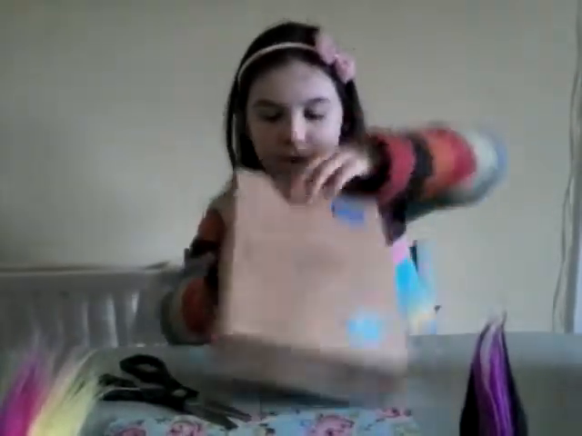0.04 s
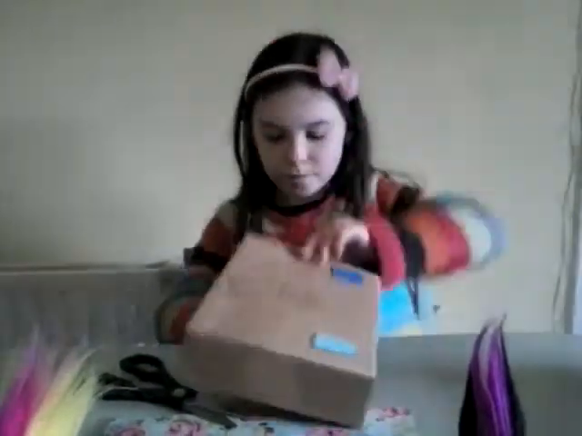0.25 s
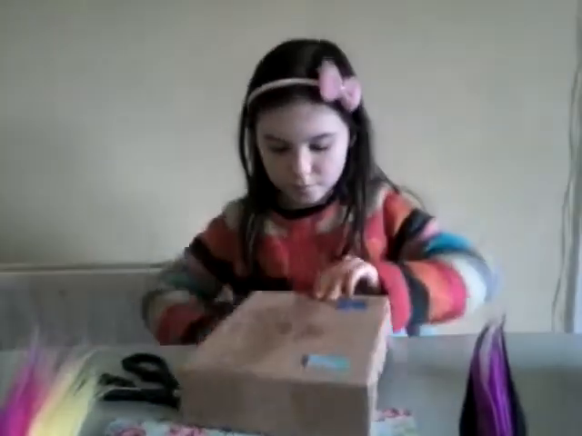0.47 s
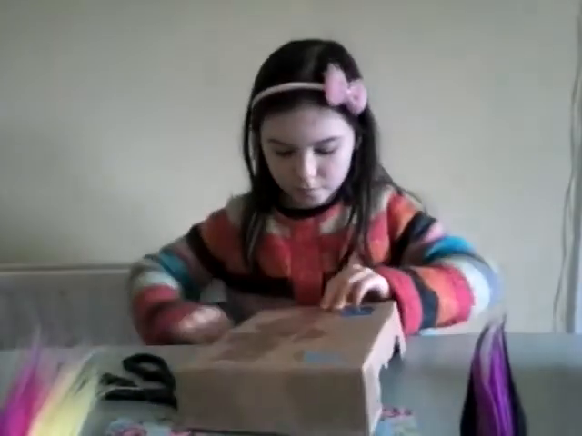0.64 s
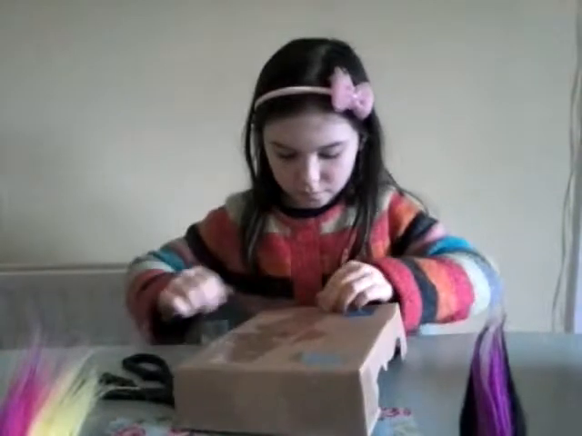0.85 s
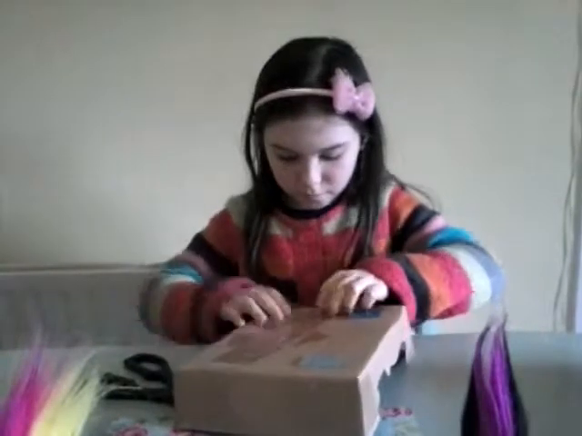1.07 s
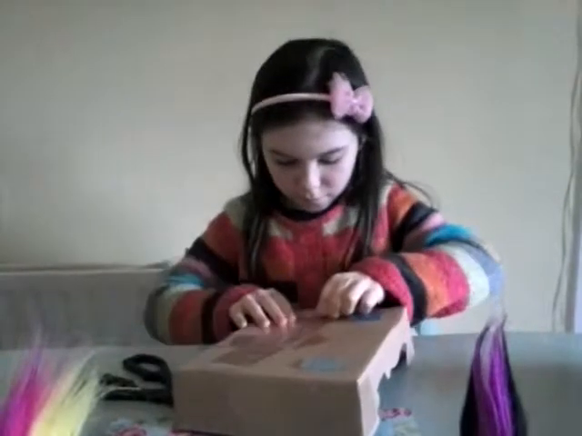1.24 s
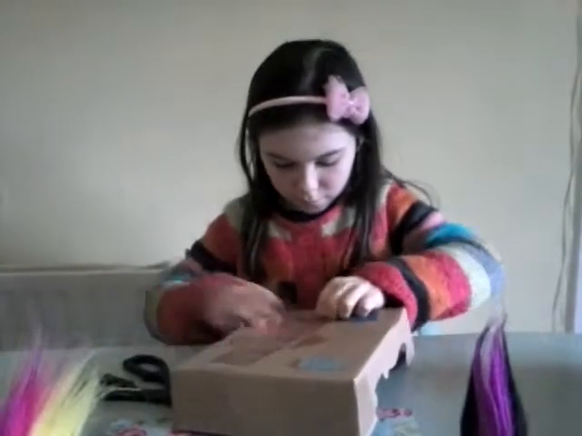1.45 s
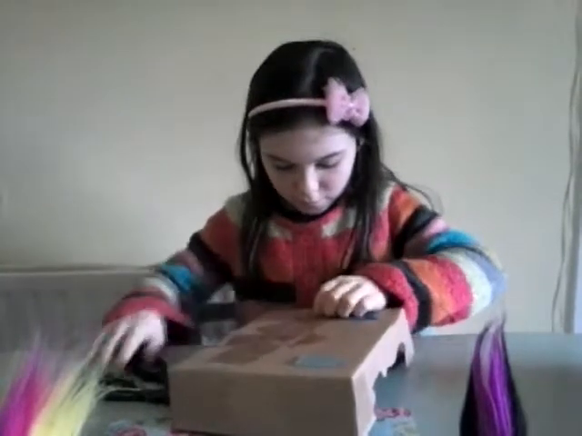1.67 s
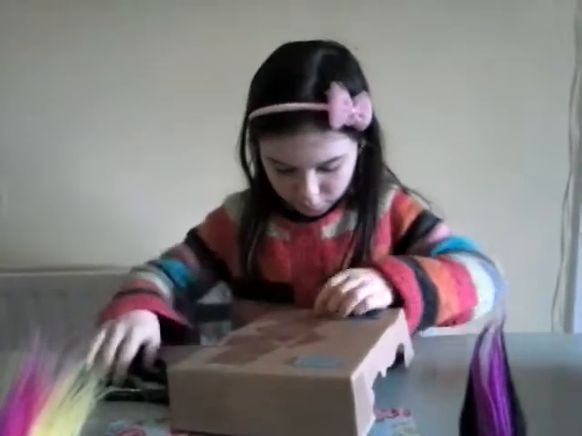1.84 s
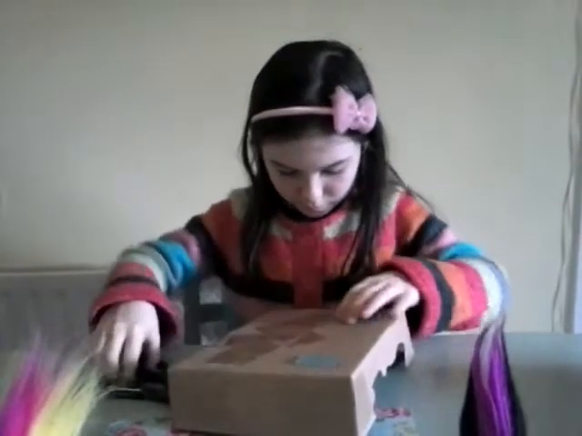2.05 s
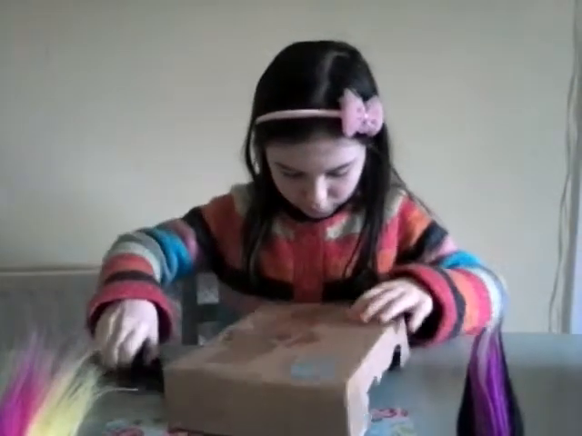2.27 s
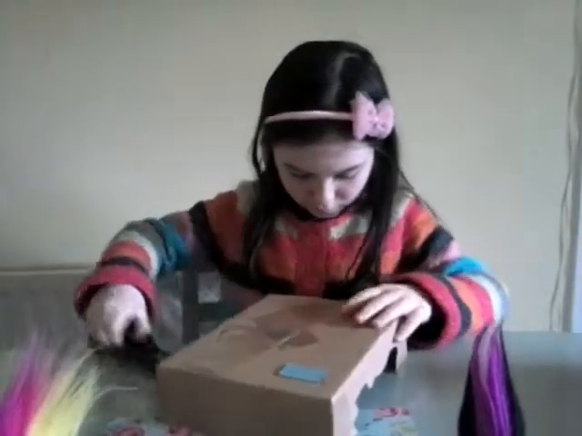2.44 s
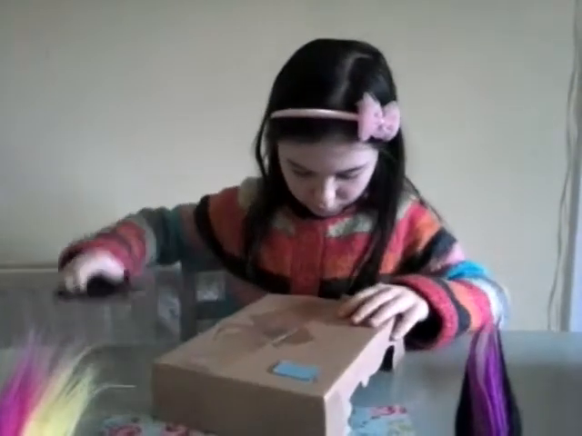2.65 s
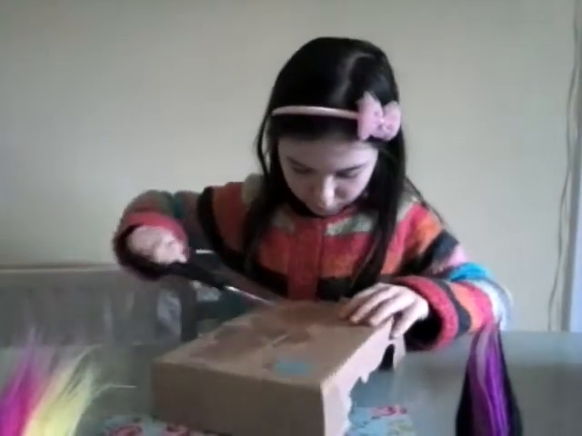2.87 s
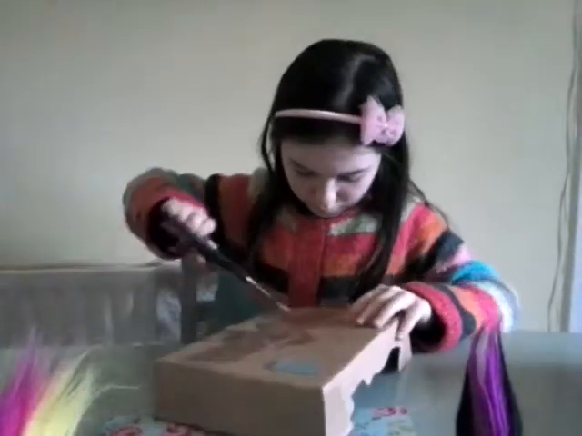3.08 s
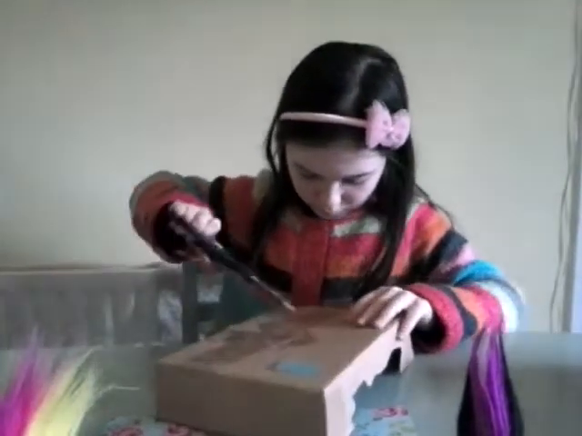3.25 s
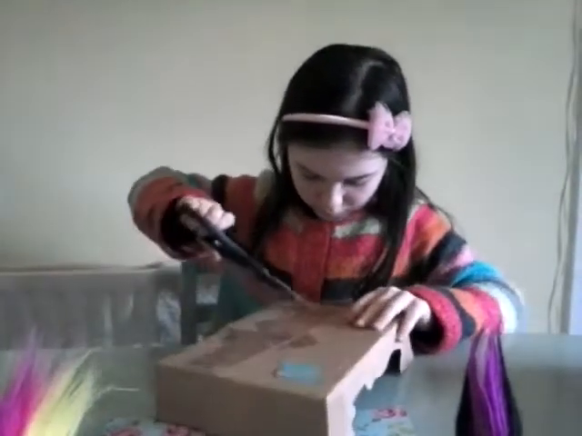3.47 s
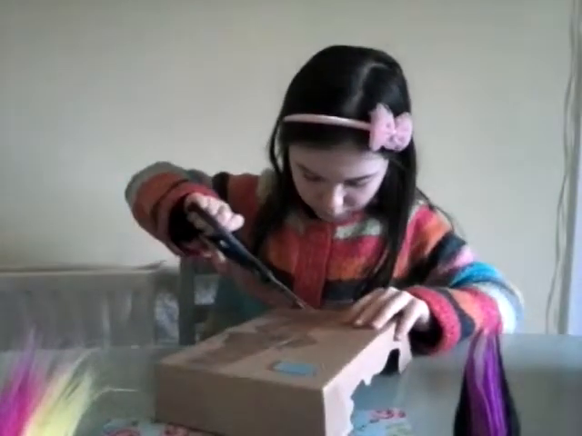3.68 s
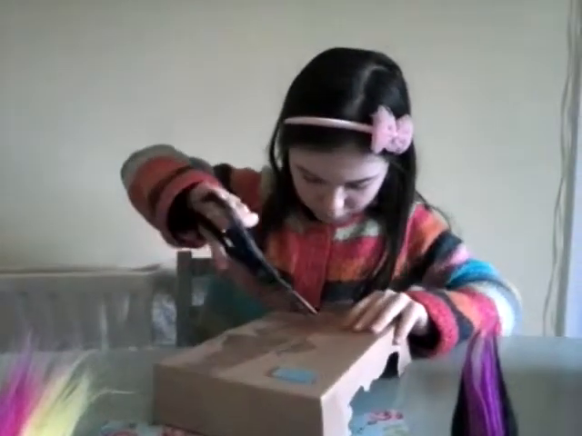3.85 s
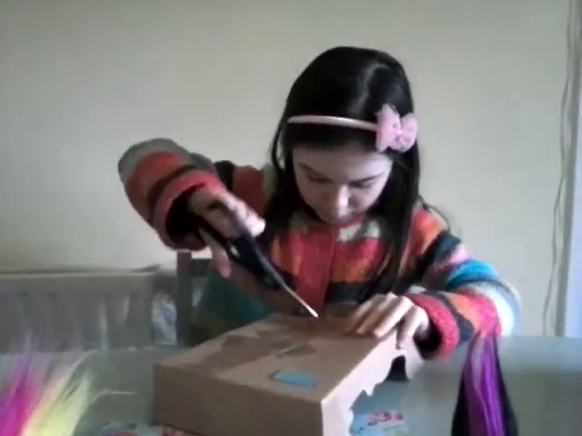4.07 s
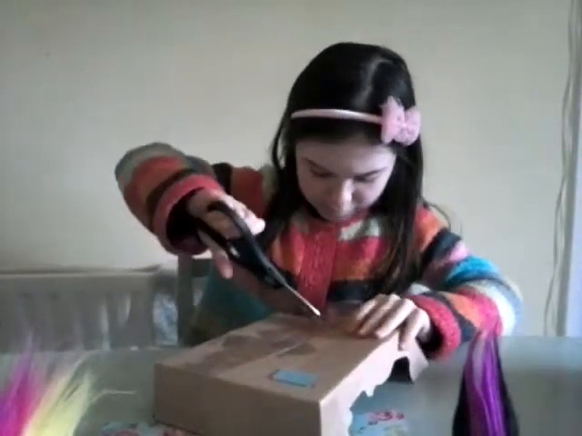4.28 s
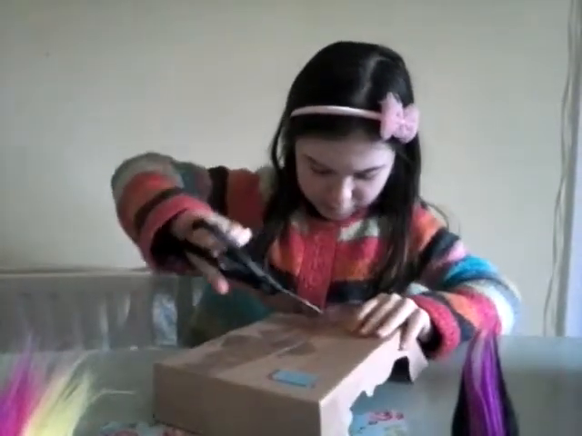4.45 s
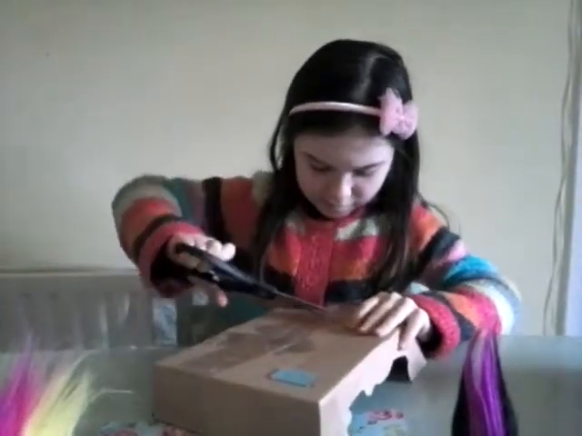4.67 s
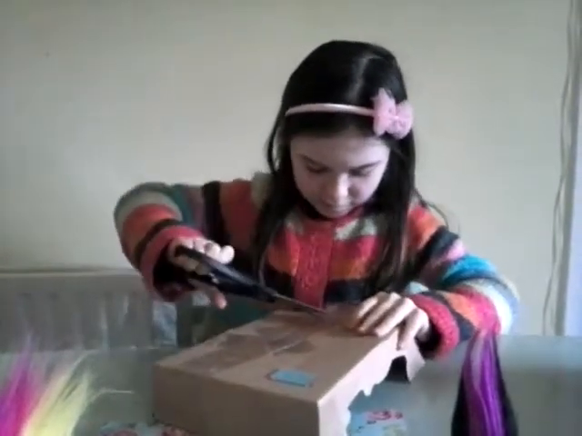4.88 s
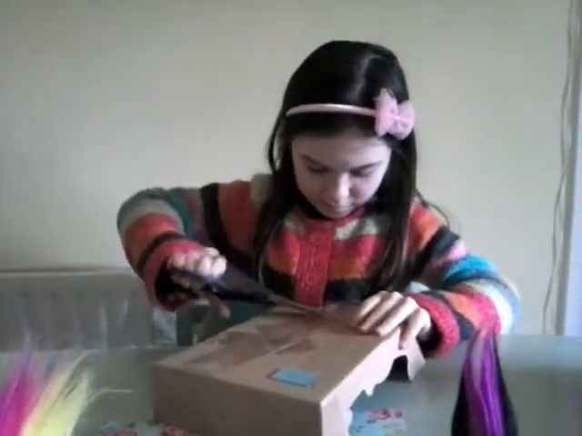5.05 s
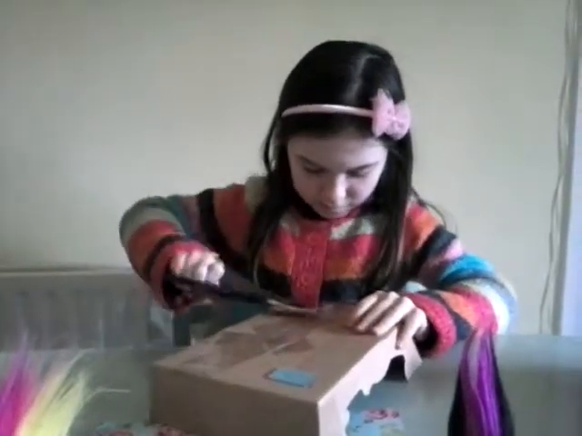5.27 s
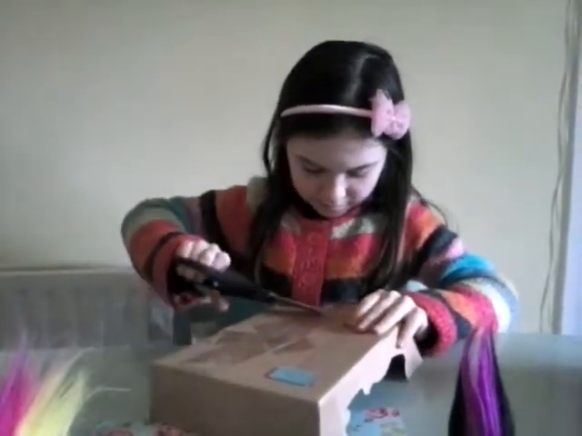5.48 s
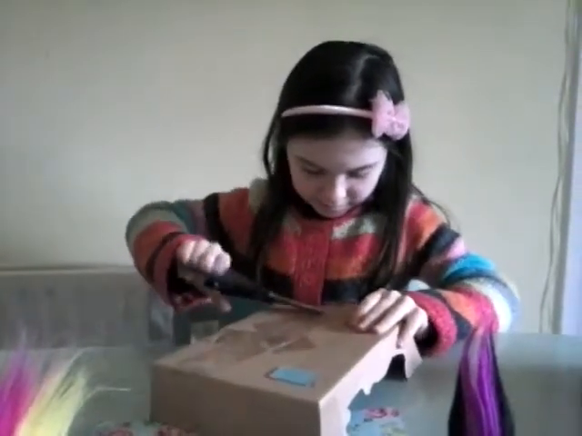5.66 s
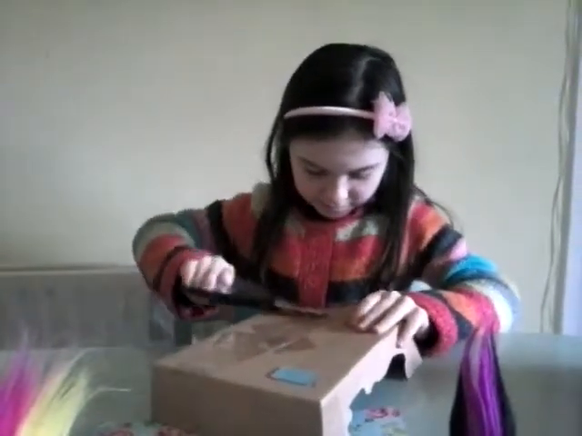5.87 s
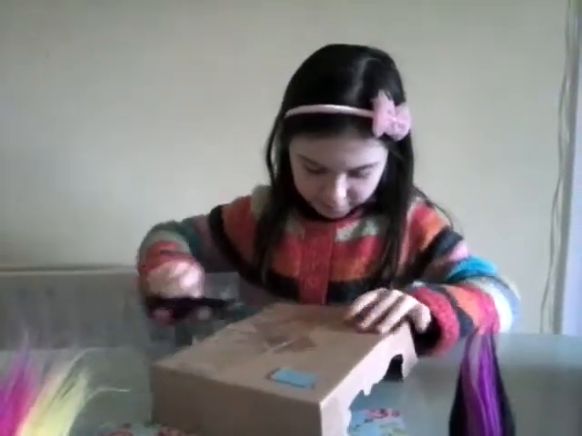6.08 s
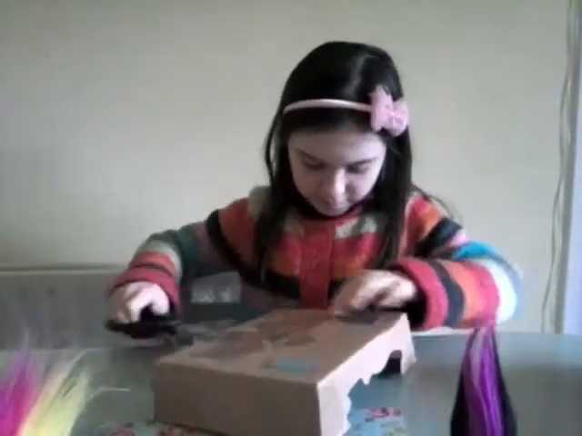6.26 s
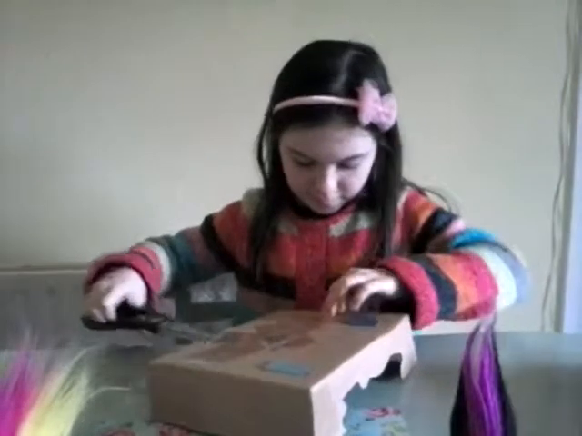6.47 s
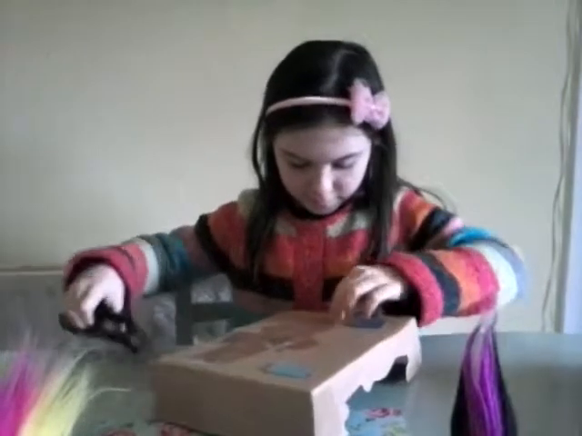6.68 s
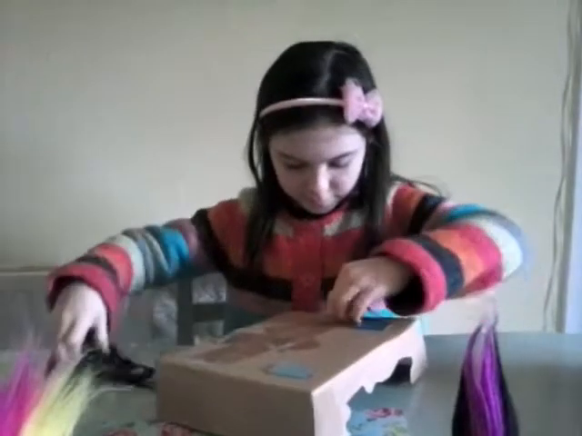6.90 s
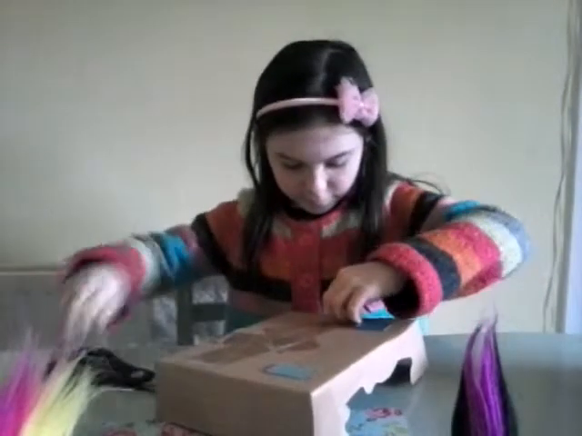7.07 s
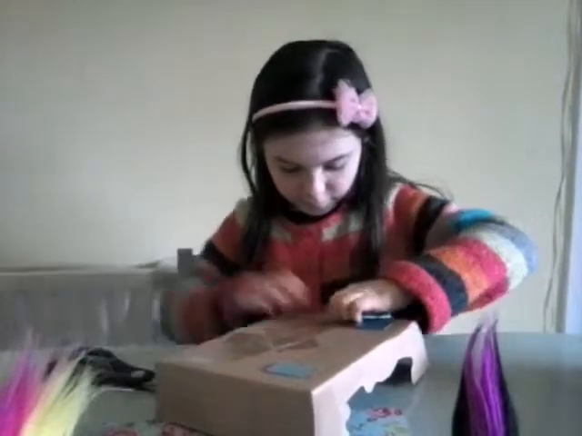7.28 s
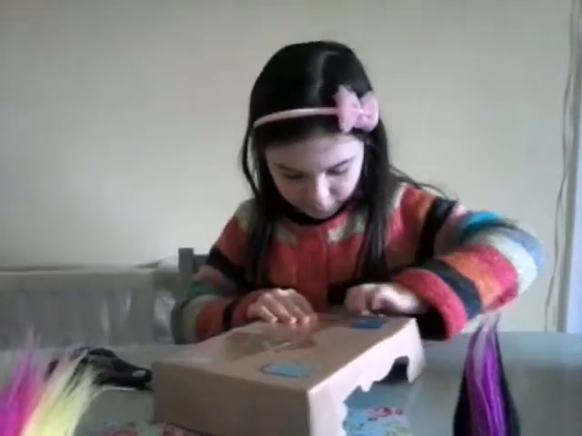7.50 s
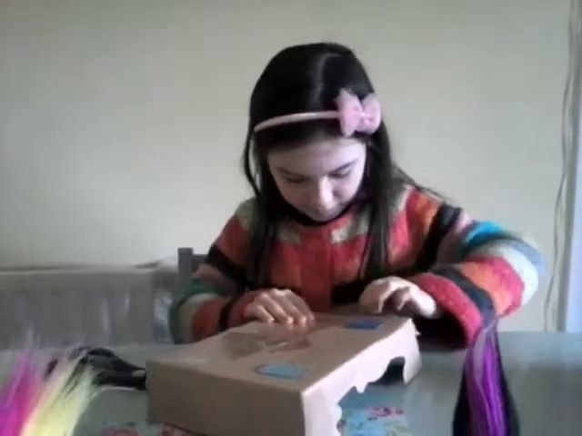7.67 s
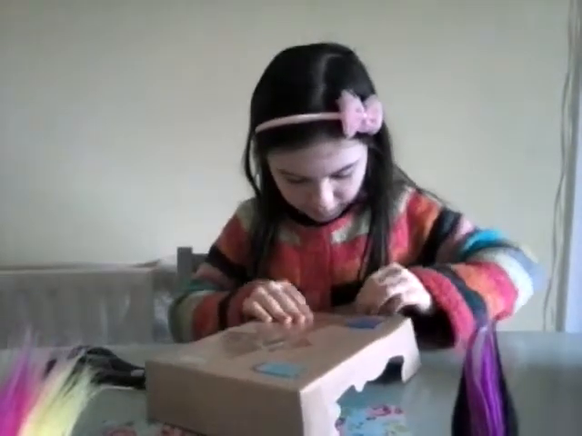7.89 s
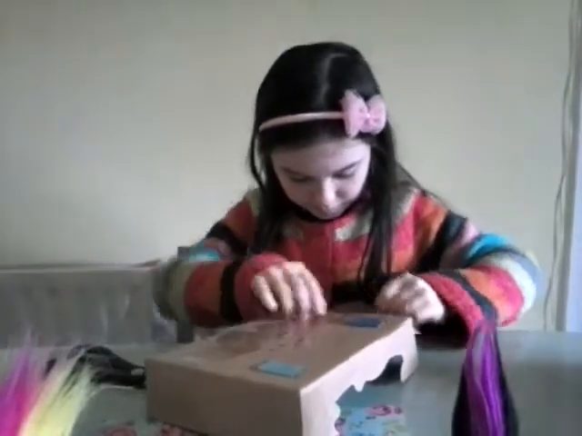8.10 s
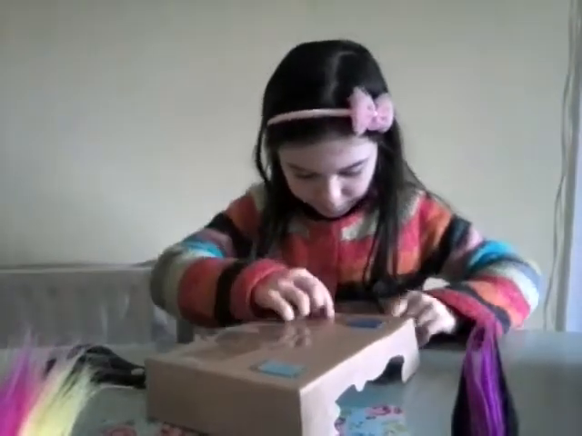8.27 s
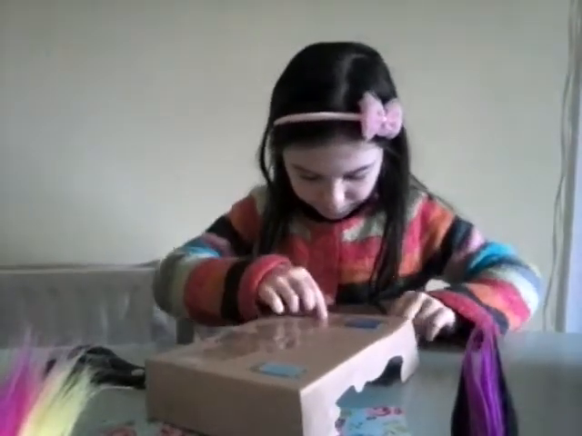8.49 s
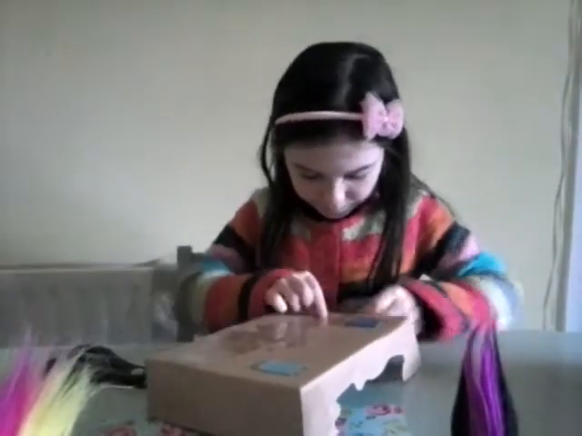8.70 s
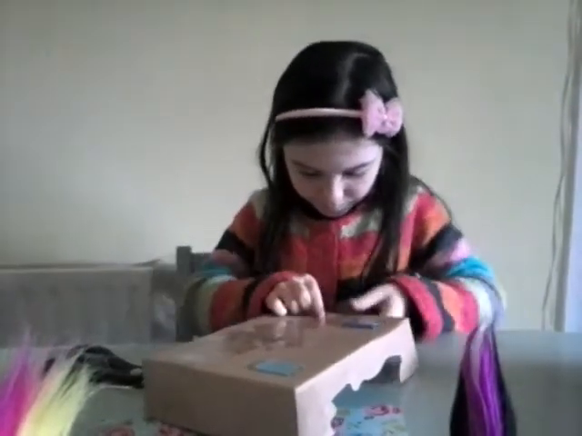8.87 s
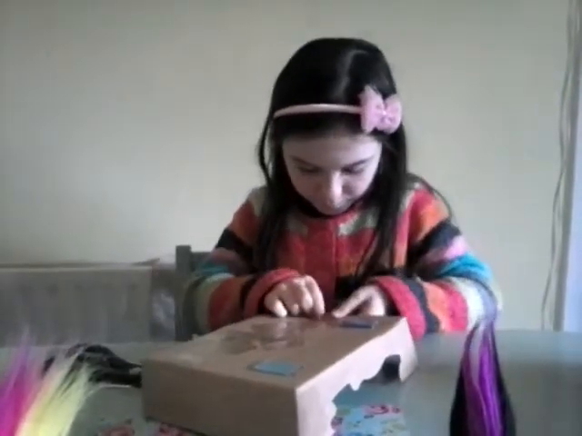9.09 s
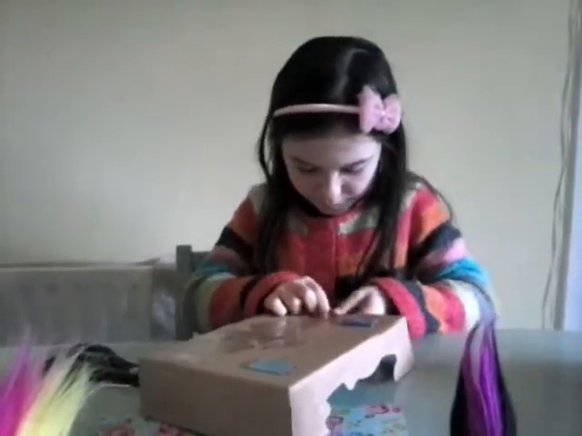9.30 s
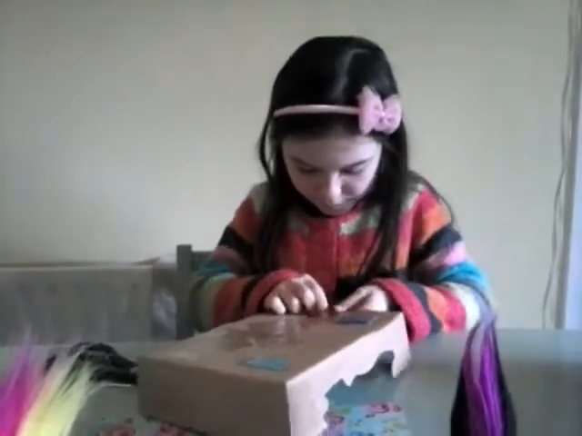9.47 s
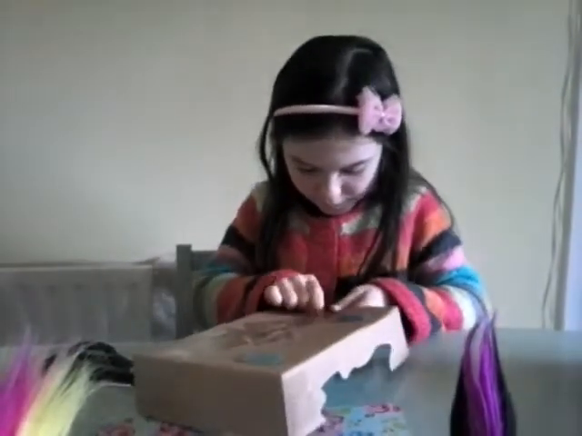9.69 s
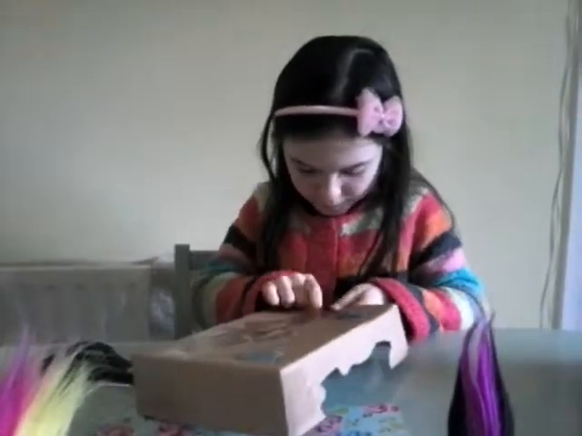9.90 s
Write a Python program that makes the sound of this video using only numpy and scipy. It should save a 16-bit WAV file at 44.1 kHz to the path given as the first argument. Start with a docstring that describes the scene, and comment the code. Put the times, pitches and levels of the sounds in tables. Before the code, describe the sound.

A stiff cardboard box is dropped, scraped and stabbed on a table, scissors clack, then fingernails pick lightly in a lively room.

```python
"""A stiff cardboard box on a table, miked close: set down, slid about, stabbed, then picked with fingernails.
Every blow is a few-millisecond crunch that rings the box panels; scissors clack and snip on modes of their own.
Rubbing is a dense train of fibre slips, in which tiny hard snaps stand out; a steady quiet floor lies below.
A bare, lively room answers blows and rubbing with early echoes and a tail that lasts longest in the upper mids.
The one small microphone clips at full scale and passes no top treble; both channels carry the same sound."""
import sys
import numpy as np
from scipy import signal
from scipy.fft import rfft, irfft
from scipy.io import wavfile

SR = 44100
rng = np.random.default_rng(int(sys.argv[2]) if len(sys.argv) > 2 else 0)


def unload_wav(signal):
    """Save mono or channel-first audio to the path in sys.argv[1] as 16-bit WAV at rate SR, clipped to [-1, 1]."""
    wavfile.write(
        sys.argv[1],
        SR,
        np.round(np.clip(np.atleast_2d(signal).T, -1, 1) * 32767).astype(np.int16),
    )


N = 438354
TAIL = 32768  # samples in one room answer or blow
BURST = TAIL // 32  # samples in one crunch
TOP_HZ = 15800

# All levels in the tables are relative; the functions add an overall level to each kind of sound.
# Steady floor at the microphone. Each row: frequency in Hz, colour in dB.
FLOOR = [(25, -22), (60, -28.5), (100, -25.5), (160, -26), (480, -29.5), (714, -22.5), (1520, -33.5),
         (3430, -36.5), (14800, -45.5), (16000, -45)]
FLOOR_DB = -62.5  # rms re full scale

# Box, hands and blade sliding; some strokes only follow a hard blow as a lingering rasp. Each row: # fastest
# moment in seconds, length in seconds, rasp level in dB, panel drone over rasp in dB, # fibre hiss over rasp in
# dB.
STROKES = [(0.098, 0.44, -39.5, -16, -10), (0.282, 0.38, -45, -20, -8), (0.382, 0.15, -28.5, -1, -11),
           (0.499, 0.19, -40, -3, -13.5), (0.778, 0.55, -45, -3, -18), (1.097, 0.089, -46.5, 2, -16),
           (1.353, 0.19, -57.5, 5, -12), (1.471, 0.21, -54, -14, -1), (1.815, .25, -47.5, -11, -14),
           (2.063, 0.19, -49.5, 2, -11), (2.333, 0.14, -33, 0, -11), (2.41, .09, -39, 8, -5),
           (2.483, 0.17, -35.5, 8.5, -11.5), (2.644, 0.26, -55.5, 5, -12.5), (2.84, 0.096, -38.5, -11, -18),
           (3.02, 0.23, -39.5, -20, -32), (3.196, 0.23, -48, 1, -12), (3.393, 0.12, -37, -4, -16.5),
           (3.597, 0.23, -37, -13, -43), (4.05, 0.45, -52.5, -2, -9.5), (4.351, 0.11, -46, 2, -10),
           (4.536, .24, -40, -20, -25), (4.754, 0.4, -56.5, -5, -7), (5.019, .24, -67.5, 0, -3),
           (5.4, 0.18, -83, -2, 10), (5.672, 0.079, -54.5, 10, -4), (5.77, 0.35, -46.5, -14, -5),
           (5.877, 0.55, -46, -4, -11.5), (6.266, 0.42, -40.5, -5.5, -17.5), (6.562, 0.62, -55.5, 2, -10),
           (6.817, 0.15, -43.5, -24, -1), (6.973, 0.46, -42.5, -6.5, -17), (7.24, 0.56, -55, 1, -11.5),
           (7.441, .24, -43.5, -4, -5.5), (7.831, 0.12, -55, -5, -7), (8.056, 0.52, -50.5, -7, -12.5),
           (8.291, 0.42, -48, -5.5, -15), (8.451, 0.087, -47, -4.5, -7), (8.69, 0.43, -54, -12, -11),
           (8.807, 0.1, -44, -1.5, -9), (8.912, 0.24, -45.5, -2, -7), (9.08, 0.25, -53.5, -1, -0.5),
           (9.45, 0.34, -54.5, 6.5, -5), (9.682, 0.95, -51.5, -4, -6.5), (9.924, 0.12, -39.5, -5.5, -9)]
# Hands resting on the paper between strokes. The row: rasp in dB, drone in dB, hiss in dB.
RESTING_DB = (-84, -80.5, -79)
# Share of a stroke's length spent swelling, and how far down it is at both ends.
STROKE_SWELL_SHARE, STROKE_EDGE_DB = 0.55, -18
# Colours of the low panel drone, the mid rasp and the high hiss. Each row: frequency in Hz, level in dB.
DRONE = [(25, -38.5), (90, -24), (200, -12.5), (400, -13.5), (580, -3), (780, -5.5), (1000, -13.5),
         (1400, -17.5), (4000, -70)]
RASP = [(300, -45), (700, -7.5), (1050, -0.5), (1900, -2.5), (2400, -6), (2900, -10), (4500, -33),
        (12000, -62.5)]
HISS = [(800, -47), (2200, -10), (3200, -0.5), (4300, 2), (5600, -3.5), (9000, -2), (11500, -9.5),
        (16000, -10.5)]
# Fibre snaps, as blows on the box: force over the stroke's hiss and its largest scatter either way, in dB.
SNAP_OVER_HISS_DB, SNAP_SPREAD_DB = 27, 6.5
SNAP_CORNER_HZ, SNAP_WEIGHT_DB, SNAP_ROOM_DB, SNAP_RING_HZ = 14000, -6.5, -0.5, 9900

# Knocks, stabs and picks on the cardboard. Each row: start in seconds, force in dB, hardness as treble
# corner in Hz, weight as extra thud in dB, room over direct in dB, ring of the struck spot in Hz.
BOX_BLOWS = [(.0488, 1, 3120, 7.5, 4, 730), (.3309, 11.5, 2020, -6, 8.5, 790),
             (.3394, 1, 7140, -5, 8.5, 754), (.3641, 10, 900, -2.5, 0.5, 716),
             (.4342, 13.5, 700, -20, -8, 690), (.5975, 24, 1190, -43, 10, 1160),
             (.6009, 19.5, 5800, -12, 4, 4300), (1.087, -13, 1100, -19, 3, 720),
             (1.1183, -8.5, 1610, -17, 0.5, 710), (1.1611, -22, 15000, -3, 3, 11000),
             (1.3134, -13, 2000, -15, 6, 1370), (1.4215, -7.5, 7500, 0, 9.5, 3080),
             (1.4589, 8, 740, -10.5, 5.5, 700), (1.5673, 11, 453, -38, 6.5, 660),
             (2.2125, 9.5, 900, -15.5, 9.5, 710), (2.2176, -6.5, 9600, -1, 10, 4160),
             (2.2807, 23, 745, -16.5, 4.5, 730), (2.2915, 14, 700, -26, -6, 780),
             (2.323, -7, 4000, -6, -3, 740), (2.3601, 1.5, 3250, -16, 9.5, 1900),
             (2.3923, 15.5, 700, -16.5, 7, 730), (2.4438, 7, 1700, -20, 10.5, 1260),
             (2.4635, 10, 1430, -26, 11.5, 1880), (2.568, 11, 456, -31, -14, 1880),
             (2.8065, -8, 3440, -19, 12.5, 760), (2.8876, 18, 1600, -20.5, 5.5, 867),
             (3.2742, 9, 1180, -23, 5.5, 706), (3.4159, 22, 425, -21, 0, 750),
             (3.5325, 5.5, 1940, -8, 6.5, 1220), (3.7814, -10.5, 1120, -28, 11.5, 746),
             (3.8428, -3, 2860, -13, 2.5, 1290), (3.9067, -14.5, 1390, -33, 17, 1330),
             (3.9753, -2, 1500, -20, 1.5, 720), (4.3215, -8.5, 2780, -2, 5, 710),
             (4.5188, -7.5, 3940, 19.5, 1, 360), (4.8152, -13.5, 1900, -6, 8.5, 1360),
             (4.8471, -7, 1800, -27, 5, 1330), (4.972, -7.5, 1710, -20, 6.5, 1330),
             (5.108, -7, 800, -22, 3, 720), (5.27, -5, 447, -14, 3, 737), (5.46, -16.5, 800, -13, 4, 764),
             (5.7248, -7.5, 4000, -1, 11, 718), (5.9735, -6.5, 1600, -16, -4, 1300),
             (6.0355, 0, 795, -2.5, 5, 704), (6.1402, 3, 2200, -13, 6, 720),
             (6.1908, 16.5, 1360, -20.5, 5.5, 2130), (7.2028, -6.5, 1000, -20, 2.5, 780),
             (7.3728, -17.5, 2500, -8, 15.5, 1610), (7.4461, -6, 4260, -21, 2, 3800),
             (7.5402, -1, 800, -20, -5, 653), (7.9297, -19, 2000, -7, 15, 713),
             (8.1432, -19.5, 15000, 13, 2, 12500), (8.1567, 4, 1330, -8.5, 5.5, 1530),
             (8.3632, -2.5, 1120, -19, 6, 2290), (8.5824, -4.5, 1140, -5, 5, 680),
             (8.8196, -9, 1760, -10, 0, 2030), (8.925, -10.5, 4500, -2, 4.5, 1900),
             (9.011, -3.5, 2840, -5, 4, 1320), (9.1957, -4.5, 1720, -10, 6, 680),
             (9.2493, -10.5, 3240, 3.5, 5, 700), (9.4736, -3.5, 2000, -20, 0.5, 714),
             (9.5251, -1, 1600, -11, 10, 2260), (9.597, -12, 5500, -14, 1, 600),
             (9.6661, -5, 4660, -26, 3, 720), (9.7653, -20.5, 8800, 9, 2, 6370),
             (9.8895, -11, 2900, -16, 0, 940), (9.9125, 0, 3620, -26, -0.5, 940)]
# Resonances of the box panels. Each row: frequency in Hz, width in Hz, lift in dB.
BOX_MODES = [(623, 26, 4), (730, 23, 7), (794, 15, 5), (1069, 13, 2.5), (1184, 51, 4), (1395, 11, 1),
             (1826, 27, 4.5), (2306, 16, 5.5), (3440, 23, 7.5), (4200, 140, -2.5), (4937, 23, 1)]
# Broad colour of the struck box. Each row: frequency in Hz, level in dB.
BOX_COLOUR = [(25, -8), (55, 2.5), (130, 0), (300, -0.5), (480, -3), (720, 0.5), (1100, -0.5), (2250, 1),
              (2900, -1.5), (4200, 1), (6500, 1.5), (8500, 5), (11000, -1), (14500, -6)]

# Scissors picked up, snipped shut and put down. Each row: start in seconds, force in dB, hardness as treble
# corner in Hz, weight as extra thud in dB, room over direct in dB, ring of the struck spot in Hz.
SCISSOR_CLACKS = [(1.6702, -8.5, 2730, 5.5, 10, 1840), (1.6913, -12, 6400, 13, 5.5, 1800),
                  (1.835, -20.5, 3500, -4, 8, 1810), (2.0191, -13.5, 2020, -3, 4.5, 1630),
                  (2.0752, -9.5, 1860, -2, 7, 3770), (4.4689, -7, 1800, -22, 7, 1280),
                  (4.4777, -3.5, 4300, -15, -8, 1400), (4.4845, -18.5, 12000, -8, 17.5, 9300),
                  (4.4946, -2, 5060, 1, -0.5, 9600), (4.5152, 0, 1000, -5, 6.5, 1300),
                  (6.4674, 0.5, 1230, -20, 3, 2300), (6.6838, -6.5, 8100, 15, 6, 4060),
                  (6.8471, 12.5, 4400, -19, 6.5, 1850), (6.8682, 0.5, 3300, 5.5, 12.5, 1760),
                  (6.8899, 1, 3500, -5, 5, 2070)]
# Resonances of the scissors. Each row: frequency in Hz, width in Hz, lift in dB.
SCISSOR_MODES = [(387.4, 33, 14.3), (620, 28, 4.3), (1708, 21, 6.7), (1980, 20, 4.4), (3550, 100, 5),
                 (3700, 170, 1.3), (4600, 17, 3.7), (7260, 32, 6.3), (9000, 370, 6.2)]
# Broad colour of the scissors. Each row: frequency in Hz, level in dB.
SCISSOR_COLOUR = [(25, -16), (65, -2.5), (110, -8), (200, 0.5), (300, -1), (420, -2.5), (720, 4.5),
                  (1300, -1.5), (2200, 3), (2800, -4.5), (4200, 3.5), (5300, 0.5), (8500, 2.5), (11000, 1),
                  (14500, -5)]

# How a contact loses treble above its corner, and where its thud lies.
CONTACT_FALL_DB_PER_OCTAVE, THUD_HZ, THUD_STEEPNESS = 11.5, 370, 2.8
# Crackle of the paper face: level at force 0 dB, dB gained per dB of force, pitch it lies above.
PAPER_DB, PAPER_GROWTH, PAPER_HZ = -29.5, 0.27, 8000

# Room decay. Each row: frequency in Hz, time to fall by 60 dB in seconds.
ROOM_T60 = [(100, 0.4), (300, 0.54), (700, 0.46), (1800, 0.67), (4800, 0.51), (12800, 0.29)]
# First echoes from the near walls. Each row: mean delay in seconds, amplitude relative to the whole tail.
ECHOES = [(.0095, 0.25), (0.016, 0.068), (.030, 0.2)]
# Standing waves between table and walls. Each row: frequency in Hz, width in Hz, lift in dB.
ROOM_MODES = [(90.5, 25, -11), (132, 6.2, 8.5), (179, 6.3, 1), (315, 35, -2), (352, 6.2, 3.5),
              (440, 7.4, 10), (940, 25, -1.5), (1486, 24, 2)]
# Colour that the room puts on reflected blows. Each row: frequency in Hz, level in dB.
ROOM_COLOUR = [(1500, 0.5), (4000, -2.5), (9000, -1), (15000, 1.5)]


def undb(db):
    """Decibels to gain."""
    return 10 ** (np.asarray(db) / 20)


def along(points, f):
    """Read (Hz, value) points on a log-frequency axis."""
    hz, value = np.transpose(points)
    return np.interp(np.log(f + 1), np.log(hz), value)


def bins(size):
    """Frequencies of a spectrum of this many samples."""
    return np.arange(size // 2 + 1) * SR / size


def lift(modes, f):
    """Decibels that a set of resonances adds at each frequency."""
    return sum(db / (1 + (2 * (f - hz) / width) ** 2) for hz, width, db in modes)


def ripple(f, per_octave):
    """Chance peaks and dips of one contact spot, with a spread near 1."""
    knots = 40 * 2 ** (np.arange(10 * per_octave) / per_octave)
    return along(np.c_[knots, rng.standard_normal(len(knots))], f)


def causal(db):
    """Minimum-phase spectrum: it has this gain and rings only after its cause."""
    cepstrum = irfft(np.log(undb(db)))
    half = len(cepstrum) // 2
    # fold the backward half of time onto the forward half
    cepstrum[1:half] *= 2
    cepstrum[half + 1:] = 0
    return np.exp(rfft(cepstrum))


def unit(x):
    """Scale to rms 1."""
    return x / np.sqrt(np.mean(x ** 2))


def unit_energy(x):
    """Scale each row to a sum of squares of 1."""
    return x / np.sqrt(np.sum(x ** 2, axis=-1, keepdims=True))


def shaped(x, db):
    """Pass a signal through a causal filter and scale it to rms 1."""
    return unit(signal.fftconvolve(x, irfft(causal(db)))[:N])


def add(track, s, sound):
    """Mix a sound in from time s."""
    start = max(int(s * SR), 0)
    part = sound[:max(N - start, 0)]
    track[start:start + len(part)] += part


def background():
    """Quiet room tone and microphone hiss: steady coloured noise."""
    return undb(FLOOR_DB) * shaped(rng.standard_normal(N), along(FLOOR, bins(TAIL)))


def room_responses(count, build_s=0.0017, sparse_db=7, merge_s=0.03):
    """Room answers for several source spots: near echoes on a tail that decays at its own rate in each band."""
    t, f = np.arange(TAIL) / SR, bins(TAIL)
    # early reflections arrive unevenly and only later merge into a wash
    clumps = np.repeat(rng.standard_normal((count, BURST)), TAIL // BURST, axis=1)
    spread_db = sparse_db * np.exp(-t / merge_s)
    uneven = undb(spread_db * np.clip(clumps, -2, 2))
    # roughly hold the mean power while the clumps even out
    uneven /= np.sqrt(np.cosh(np.log(undb(spread_db)) * 2))
    noise = rfft((rng.standard_normal((count, TAIL)) * uneven).astype(np.float32))
    centres, t60s = np.transpose(ROOM_T60)
    build = 1 - np.exp(-(t / build_s) ** 2)
    tails = 0
    # overlapping bands, one around each frequency of the decay table
    for share, t60 in zip(np.eye(len(centres)), t60s):
        band = along(np.c_[centres, share], f).astype(np.float32)
        fade = np.exp(-np.log(1000) * t / t60) * build
        tails = tails + irfft(noise * band) * fade.astype(np.float32)
    tails = unit_energy(tails)
    for delay, gain in ECHOES:
        # each source spot hears the wall a little sooner or later
        spots = (delay * SR * (1 + 0.044 * rng.standard_normal(count))).astype(int)
        tails[np.arange(count), spots] += gain
    return unit_energy(tails)


def stroke_levels():
    """Gains of rasp, drone and hiss: every stroke swells to its fastest moment and dies away."""
    t = np.arange(0, N / SR, .002)
    power = undb(RESTING_DB)[:, None] ** 2 + np.zeros(len(t))
    for s, length_s, rasp_db, drone_db, hiss_db in STROKES:
        before = (s - t) / STROKE_SWELL_SHARE
        after = (t - s) / (1 - STROKE_SWELL_SHARE)
        away = np.maximum(before, after) / length_s  # 0 at the fastest moment, 1 at both ends
        layers_db = rasp_db + np.array([[0], [drone_db], [hiss_db]])
        power += undb(layers_db + STROKE_EDGE_DB * away) ** 2
    return [np.interp(np.arange(N) / SR, t, np.sqrt(p)) for p in power]


def slips(per_s, spread_db, smooth):
    """Fibres catching and letting go: clicks of uneven size over a little smooth friction."""
    caught = rng.random(N) < per_s / SR
    size = undb(spread_db * np.minimum(rng.exponential(size=N), 3))
    clicks = unit(caught * size * rng.choice([-1, 1], N))
    return clicks + smooth * rng.standard_normal(N)


def friction(colour_db, per_s, spread_db, smooth, ripple_db=2.5, jerk_db=7, jerks_per_s=60, count=5):
    """Several contact patches, each with its own ring and its own wavering grip, slide together."""
    f, total = bins(TAIL), 0
    for _ in range(count):
        jerk_count = N // 100  # more than the length needs
        jerk_at = np.arange(N) / SR * jerks_per_s
        grip = np.interp(jerk_at, np.arange(jerk_count), rng.standard_normal(jerk_count))
        patch_db = colour_db + ripple_db * ripple(f, per_octave=8)
        rough = slips(per_s / count, spread_db, smooth) * undb(jerk_db * np.tanh(grip))
        total = total + shaped(rough, patch_db)
    return unit(total)


def rubbing(drone_db, rasp_db, hiss_db, direct_db):
    """Coarse slips drive the box panels, finer ones rasp and hiss on the paper face; the room answers."""
    f = bins(TAIL)
    rasp, drone, hiss = stroke_levels()
    panels = lift(BOX_MODES, f) + lift(ROOM_MODES, f)
    low = friction(along(DRONE, f) + panels, per_s=63, spread_db=-3, smooth=0.15)
    mid = friction(along(RASP, f) + panels, per_s=140, spread_db=5, smooth=0.21)
    high = friction(along(HISS, f) + panels, per_s=350, spread_db=4.0, smooth=0.28)
    close = drone * undb(drone_db) * low
    close += rasp * undb(rasp_db) * mid
    close += hiss * undb(hiss_db) * high
    reflected = signal.fftconvolve(close, room_responses(count=1)[0])[:N]
    return undb(direct_db) * close + reflected


def fibre_snaps():
    """Near the fastest moment of each stroke a fibre snaps: a tiny, hard blow on the box."""
    snaps = []
    for s, length_s, rasp_db, _, hiss_db in STROKES:
        when, scatter, place = rng.uniform(-1, 1, 3)
        force_db = rasp_db + hiss_db + SNAP_OVER_HISS_DB + SNAP_SPREAD_DB * scatter
        ring_hz = SNAP_RING_HZ * 2 ** (place / 2)  # up to half an octave either way
        snaps.append((s + when * length_s / 2, force_db, SNAP_CORNER_HZ, SNAP_WEIGHT_DB, SNAP_ROOM_DB, ring_hz))
    return snaps


def crunch(noise, length_s):
    """Nearly colourless spectrum of a contact that gives way in many tiny steps."""
    age = np.arange(len(noise)) / SR / length_s
    spectrum = rfft(noise * np.sqrt(age) * np.exp(-age), TAIL)
    # flatten the spectrum, then cut the burst back to its own length
    burst = irfft(spectrum / np.abs(spectrum))[:len(noise)]
    return rfft(unit_energy(burst), TAIL)


def contact(f, force_db, corner_hz, weight_db):
    """Decibels of one push: softness costs treble, weight moves the lows, and the paper always crackles."""
    steepness = CONTACT_FALL_DB_PER_OCTAVE / (10 * np.log10(2))
    softness_db = 10 * np.log10(1 + (f / corner_hz) ** steepness)
    thud_db = weight_db / (1 + (f / THUD_HZ) ** THUD_STEEPNESS)
    push = undb(force_db - softness_db + thud_db)
    paper = undb(PAPER_DB + PAPER_GROWTH * force_db) * f / np.hypot(f, PAPER_HZ)
    return 20 * np.log10(np.hypot(push, paper))


def blows(table, colour, modes, contact_s, gain_db, room_db, spot_db, spot_width, ripple_db, spot_in_room):
    """Each blow rings the object with its own hardness and reaches the microphone directly and by the room."""
    f, track = bins(TAIL), np.zeros(N)
    body_db = along(colour, f) + lift(modes, f) + gain_db
    walls_db = along(ROOM_COLOUR, f) + lift(ROOM_MODES, f) + room_db
    steps = rng.standard_normal((len(table), BURST))
    for row, noise, room in zip(table, steps, room_responses(len(table))):
        s, force_db, corner_hz, weight_db, wet_db, spot_hz = row
        blow_db = body_db + contact(f, force_db, corner_hz, weight_db)
        # the struck place favours one resonance and roughens the rest; the room softens this
        spot = lift([(spot_hz, spot_hz * spot_width, spot_db)], f) + ripple_db * ripple(f, per_octave=14)
        direct = causal(blow_db + spot) * crunch(noise, contact_s)
        reflected = causal(blow_db + spot_in_room * spot + walls_db + wet_db) * rfft(room)
        add(track, s, irfft(direct + reflected)[:-4 * BURST])  # without the very end of the block
    return track


def box_blows():
    """Knocks, stabs, picks and fibre snaps: short crunches that ring the cardboard panels."""
    return blows(BOX_BLOWS + fibre_snaps(), BOX_COLOUR, BOX_MODES, contact_s=0.0011, gain_db=-3.5,
                 room_db=-2.0, spot_db=11.0, spot_width=0.18, ripple_db=4.0, spot_in_room=0.62)


def scissor_clacks():
    """Scissors handled and snipped: slightly longer crunches that ring the scissors' own modes."""
    return blows(SCISSOR_CLACKS, SCISSOR_COLOUR, SCISSOR_MODES, contact_s=0.0019, gain_db=-3.5,
                 room_db=-1.0, spot_db=9.5, spot_width=0.17, ripple_db=4.0, spot_in_room=0.89)


def scene():
    """Box, scissors and rubbing over the room tone, the same in both channels."""
    mono = background()
    mono += rubbing(drone_db=-2.5, rasp_db=-4.5, hiss_db=1.5, direct_db=-5.0)
    mono += box_blows()
    mono += scissor_clacks()
    return np.array([mono, mono])


def record(dry):
    """The microphone input sits slightly off zero, clips at full scale and then loses the top."""
    clipped = np.clip(dry + .002, -1, 1)
    lowpass = signal.ellip(10, .2, 80, TOP_HZ, fs=SR, output="sos")
    return signal.sosfilt(lowpass, clipped)


dry = scene()
out = record(dry)
unload_wav(out)
```